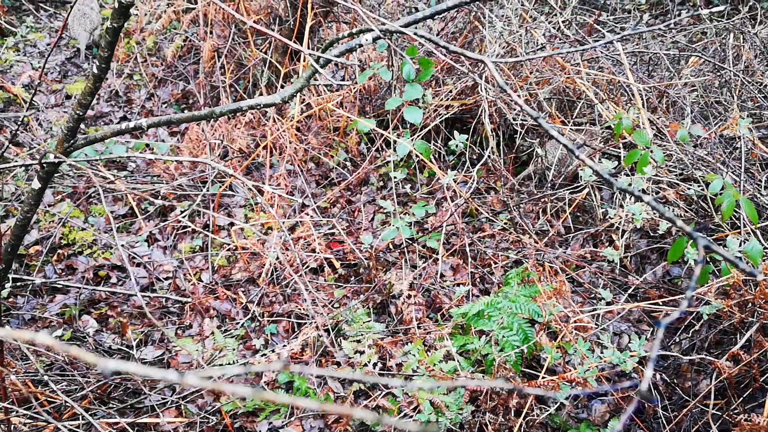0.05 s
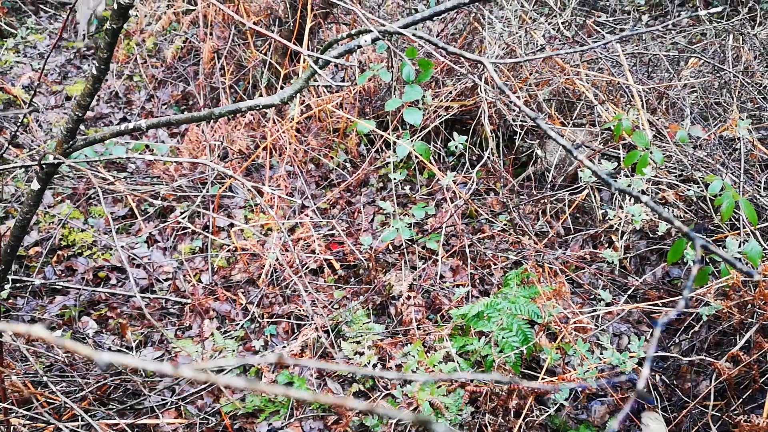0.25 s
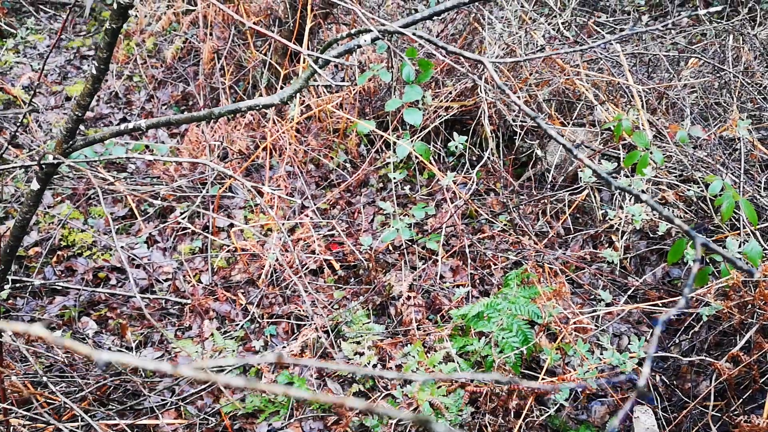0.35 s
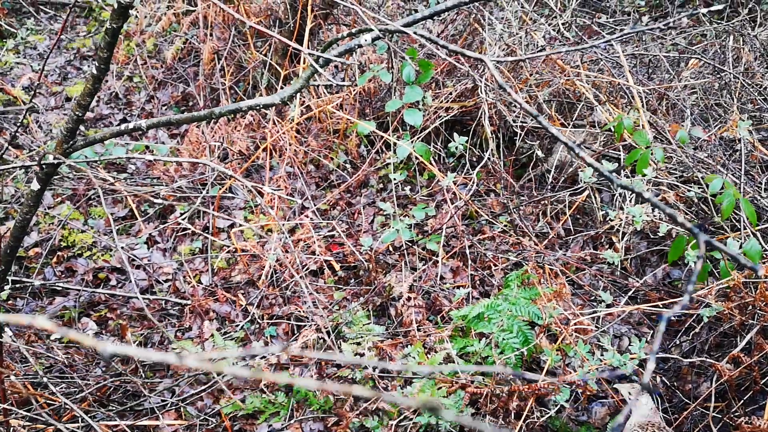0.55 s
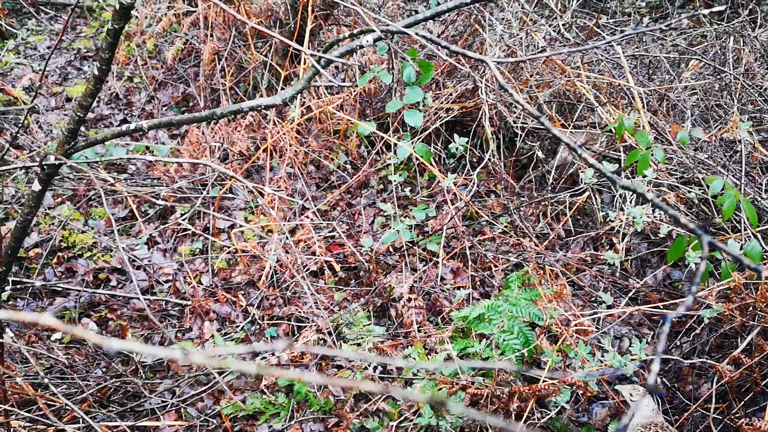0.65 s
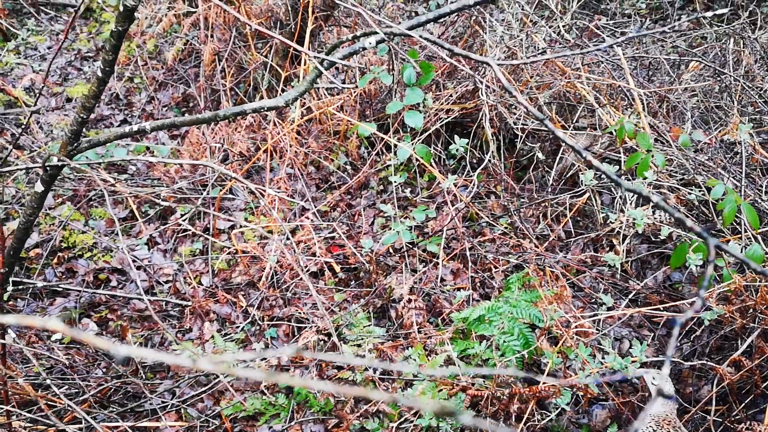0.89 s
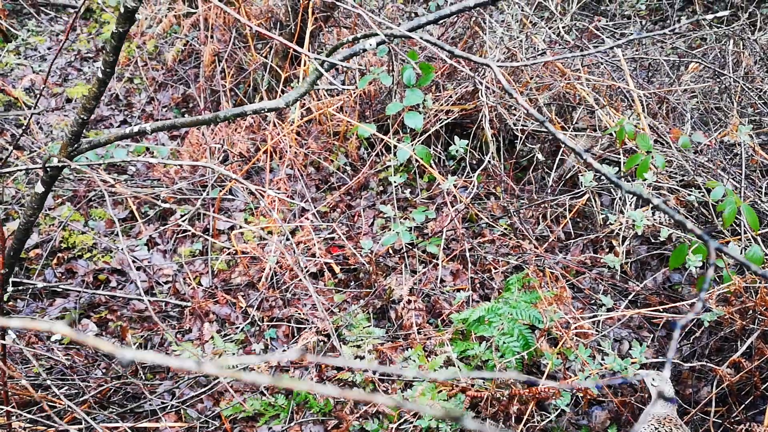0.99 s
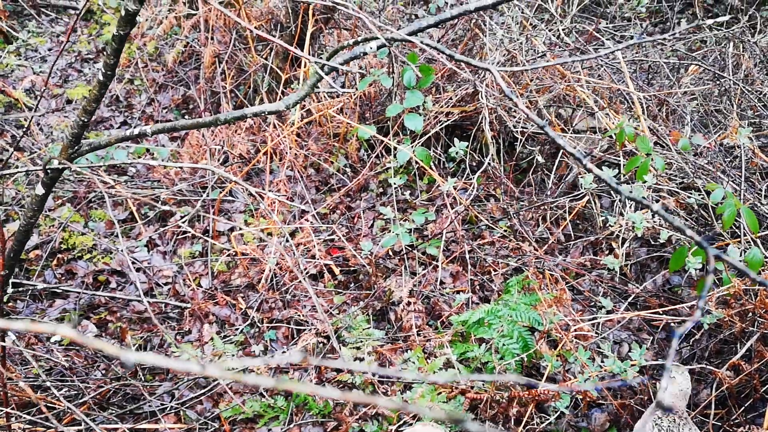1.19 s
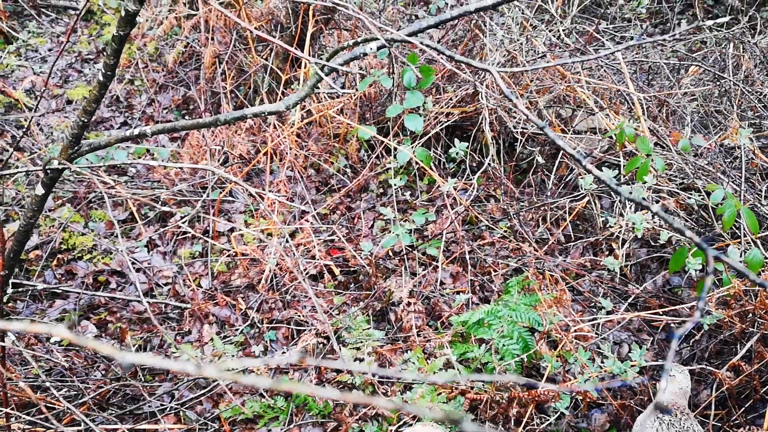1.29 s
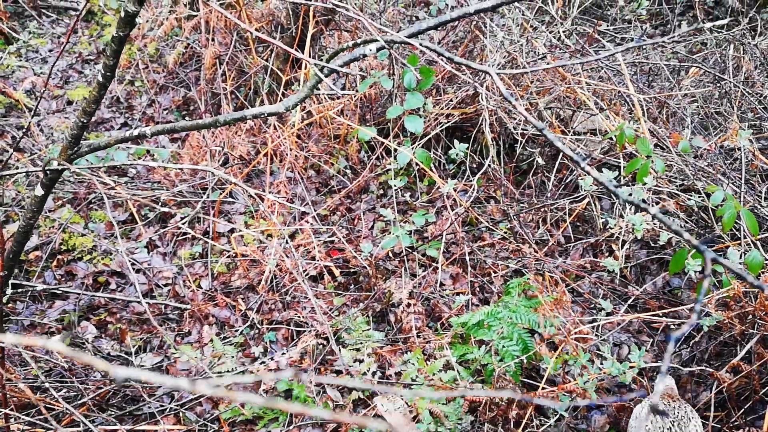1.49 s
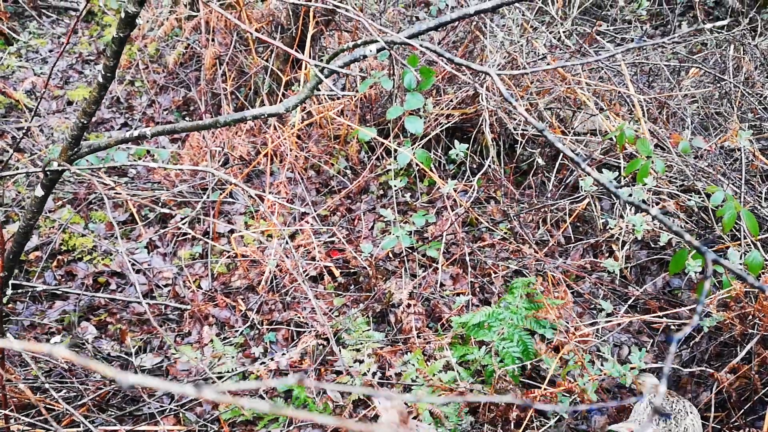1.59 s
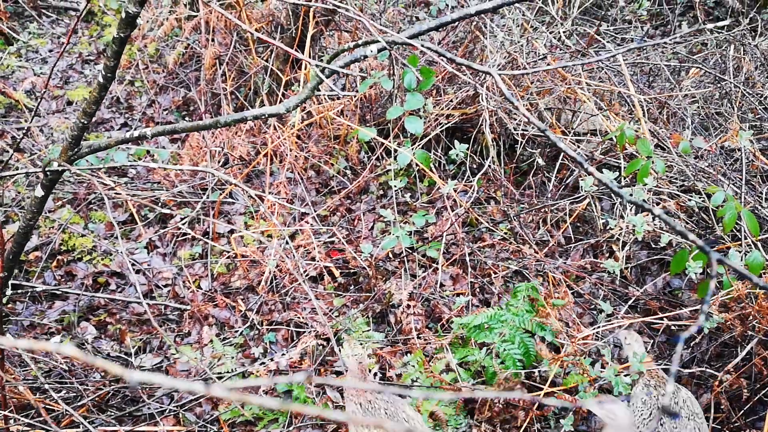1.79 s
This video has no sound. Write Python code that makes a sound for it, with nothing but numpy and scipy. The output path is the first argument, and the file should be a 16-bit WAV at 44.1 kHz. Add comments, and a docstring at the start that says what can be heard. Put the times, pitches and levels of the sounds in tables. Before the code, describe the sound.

Pheasants scuffle in dry bracken and dead leaves. A faint rustle breaks into dull thumps and crunching over a low rumble, then eases to light rustling, twig ticks and two more thumps in a quiet wood.

```python
"""A faint rustle in a quiet wood breaks into a short scuffle: pheasants in dry bracken and dead leaves.
Dull thumps and crunching litter give way to light rustling, small twig ticks and two more thumps.
Each thump is a soft low pulse and a short shudder, with a brief crunch of leaves and stalks on top.
The litter breaks in tiny grains, twigs snap and ring, fronds swish and small stems patter.
A low rumble swells under the scuffle, and faint woodland air lies under it all."""
import sys
import numpy as np
from scipy import signal
from scipy.io import wavfile

SR = 44100
rng = np.random.default_rng(int(sys.argv[2]) if len(sys.argv) > 2 else 0)


def put_to_file(sound):
    """Save the sound as 16-bit audio at rate SR, in the file named by the first command-line argument."""
    columns = np.atleast_2d(sound).T  # one column per channel
    safe = np.clip(columns, -1, 1)
    whole_steps = np.round(safe * 32767)
    wavfile.write(sys.argv[1], SR, whole_steps.astype(np.int16))


N = 81585
T = np.arange(N) / SR

# Tone of the woodland air: frequency_hz, relative_db
AIR_COLOUR = [(20, 7.5), (50, -1), (100, -16), (220, -11.5), (330, -13), (500, -23), (900, -20),
              (1800, -49.5), (3000, -41), (8000, -43.5), (15000, -44)]
# Stereo width of the noise layers: frequency_hz, left_right_correlation
STEREO_LIKENESS = [(60, 1), (150, 1), (300, 0.53), (600, -0.76), (1200, 0.61), (2200, -0.24), (4000, 0.07),
                   (7000, -0.12), (15000, -.1)]

# Level ride of the rustling litter: time_s, leaf_db, stalk_db
RUSTLE_LEVELS = [(0, -71.5, -65.5), (.09, -69.5, -60.5), (.14, -63.5, -57.5), (.22, -57.5, -59),
                 (.245, -49.5, -46.5), (.30, -51, -55), (.36, -45, -45.5), (.395, -60, -50),
                 (.44, -50.5, -51.5), (.48, -48.5, -46), (.52, -49.5, -42), (.555, -46, -39.5),
                 (.60, -60, -54), (.66, -59.5, -60.5), (.76, -65, -61), (.90, -67.5, -61.5),
                 (.95, -62, -64), (1.06, -66, -61), (1.125, -61.5, -62.5), (1.22, -70.5, -66.5),
                 (1.26, -59.5, -60), (1.31, -71.5, -65), (1.375, -61.5, -57.5), (1.46, -70, -63.5),
                 (1.53, -65.5, -61), (1.60, -64.5, -60.5), (1.71, -60, -64.5), (1.79, -65, -63),
                 (1.85, -57, -65)]
# Single crunches, a woody crack with a crisp top: start_s, decay_s, stalk_db, leaf_db
LITTER_CRUNCHES = [(0.166, 0.0045, -43.5, -58), (0.2255, 0.0072, -29, -32), (0.2792, 0.0058, -36, -41),
                   (0.289, 0.0031, -45, -45), (0.3107, 0.001, -50, -43), (0.3132, 0.0099, -32.5, -46),
                   (0.3441, 0.0047, -31, -33), (0.3516, 0.0024, -33.5, -39), (0.4240, 0.007, -38.5, -60),
                   (0.4415, 0.008, -53, -44.5), (0.4633, 0.0041, -32, -37.5), (0.4751, 0.0056, -33.5, -43),
                   (0.5034, 0.0026, -47, -47), (0.5429, 0.0059, -34, -41.5), (0.9229, 0.0022, -59, -41.5),
                   (0.944, 0.0062, -57, -52.5), (1.0209, 0.004, -74, -48), (1.1708, 0.013, -54.5, -61),
                   (1.249, 0.0034, -42.5, -40.5), (1.5359, 0.0025, -53, -75),
                   (1.5482, 0.0074, -46.5, -48.5), (1.812, 0.0052, -54, -48), (1.8302, 0.0021, -55, -45)]
# Crisp tone of dry leaves: frequency_hz, relative_db
LEAF_COLOUR = [(1500, -47), (2600, 0.5), (3300, 2), (4000, -0.5), (4600, -0.5), (5500, 3.5), (6500, 2.5),
               (8000, 2.5), (10000, -11.5), (12500, -14), (15000, -16.5)]
# Woody tone of stalks: frequency_hz, relative_db
STALK_COLOUR = [(350, 15), (520, -0.5), (750, -2.5), (1100, 1), (1500, 7), (2000, 9), (2600, -1),
                (3500, -12.5), (6000, -68)]
# Panning of litter and fronds, band by band: frequency_hz, left_minus_right_db
LITTER_PAN = [(350, -1.5), (650, -17), (1290, 2.5), (2200, 1.5), (4400, -1.5), (8120, 6.5), (10500, -4.5),
              (13000, 1)]

# Level ride of the low rumble: time_s, level_db
RUMBLE_LEVELS = [(0, -75), (.22, -54.5), (.30, -44), (.36, -39.5), (.41, -41.5), (.45, -56), (.49, -40.5),
                 (.57, -65), (.62, -56.5), (.92, -61.5), (1.02, -51), (1.09, -57), (1.85, -61.5)]
# Tone of the rumble: frequency_hz, relative_db
RUMBLE_TONE = [(20, 20), (45, 14.5), (90, 7.5), (170, 9.5), (320, -14), (480, -55), (900, -53)]
# Soft blows of the moving birds: crest_s, level_db, pitch_hz, shudder_db
THUMP_HITS = [(0.1700, -41, 217, -67), (0.2324, -14, 233.4, -30.5), (0.318, -25, 290, -43),
              (0.3555, -22.5, 190, -42), (0.483, -25, 171, -36.5), (0.5085, -36, 195, -40.5),
              (0.5382, -28.5, 200, -42.5), (0.57, -29, 211, -43), (1.1541, -39, 194, -62),
              (1.1670, -33.5, 195, -49), (1.2527, -21.5, 211.5, -37), (1.5556, -23.5, 198, -38)]

# Twigs that tick: start_s, level_db, pitch_hz
TWIG_TICKS = [(0.231, -26, 1080), (0.3158, -25.5, 1050), (0.3765, -31.5, 1468), (0.4008, -38, 1670),
              (0.424, -31, 1600), (0.4418, -30.5, 1352), (0.4617, -33.5, 1156), (0.6127, -33.5, 1760),
              (0.637, -49, 1940), (0.6596, -45, 3640), (0.664, -48, 3840), (0.6974, -40, 1780),
              (0.714, -46.5, 1710), (0.775, -51, 2080), (0.7876, -44, 1489), (0.8105, -44.5, 2004),
              (0.8618, -43.5, 1763), (1.248, -37.5, 2050), (1.2776, -45, 1910), (1.554, -42.5, 1980),
              (1.5812, -48.5, 1927), (1.7835, -45, 3050)]
# Ringing modes of a twig: pitch_ratio, relative_db
TWIG_PARTIALS = [(.72, -12), (1.001, -0.5), (1.17, -8), (1.551, -17), (2.2, -13.5)]
# Soft brushes through the fronds: crest_s, half_width_s, level_db
FROND_SWISHES = [(.33, .04, -56), (0.504, 0.02, -56), (1.168, 0.021, -64), (1.255, .012, -57.5),
                 (1.428, 0.097, -65), (1.555, 0.027, -63.5), (1.628, 0.069, -65), (1.83, 0.005, -56.5)]
# Dull tone of brushed fronds: frequency_hz, relative_db
FROND_COLOUR = [(300, -2), (520, -1), (900, 0.5), (1300, -17), (2000, -49), (3000, -30)]
# Level ride of the pattering stems: time_s, level_db
PATTER_LEVELS = [(0, -96), (.3, -66), (.56, -54), (.66, -65), (.9, -67), (1.1, -71.5), (1.38, -73),
                 (1.85, -67.5)]

PAN_SPLIT = np.array([[.5], [-.5]])   # half of a pan's dB lifts the left, half lowers the right
WOOD_PAN_DB = 3   # twigs and stems sit a little to the left


def from_db(db):
    """Decibels to gain."""
    return 10 ** (np.asarray(db) / 20)


def rms_one(x):
    """Scale to rms 1."""
    return x / np.sqrt(np.mean(x ** 2) + 1e-20)


def ride(rows):
    """Fader curves: straight lines through timed points, one curve for each level column."""
    times, *columns = np.transpose(rows)
    return [np.interp(T, times, column) for column in columns]


def at_hz(points, hz):
    """Read a curve on a log-frequency axis."""
    frequencies, values = np.transpose(points)
    return np.interp(np.log(hz), np.log(frequencies), values)


def band(x, low_hz, high_hz, order=2):
    """Butterworth band-pass."""
    edges_hz = [low_hz, min(high_hz, SR / 2 - 100)]
    return signal.sosfilt(signal.butter(order, edges_hz, "band", fs=SR, output="sos"), x + 1e-18)


def drift(rate_hz):
    """A smooth random wobble of rms 1."""
    pole = np.exp(-2 * np.pi * rate_hz / SR)
    return rms_one(signal.lfilter([1], [1, -2 * pole, pole * pole], rng.standard_normal(2 * N))[N:])


def swell(start_s, rise_s, decay_s):
    """A straight attack, then an exponential tail."""
    age = np.maximum(T - start_s, 0)
    return np.minimum(age / rise_s, 1) * np.exp(-np.maximum(age - rise_s, 0) / decay_s)


def grains(per_s, spread_db):
    """Random tiny fractures of uneven size, as four uncorrelated streams that share their timing."""
    sizes = from_db(spread_db * np.minimum(rng.exponential(1, N), 5))
    breaks = rng.random(N) < per_s / SR
    return rms_one(sizes * breaks * rng.standard_normal((2, 2, N)))


def coloured(drive, colour, pan_curve=None, flicker_db=0):
    """Third-octave EQ that turns two white mid/side pairs into stereo at about the same level."""
    out, power = 0, 0
    edges_hz = 18 * 2 ** (np.arange(31) / 3)
    for k, (low, high) in enumerate(zip(edges_hz, edges_hz[1:])):
        hz = np.sqrt(low * high)
        if not colour[0][0] / 2 < hz < colour[-1][0] * 2:
            continue
        mid, side = band(drive[k % 2], low, high, order=3 if hz > 1000 else 2)
        alike = np.clip(at_hz(STEREO_LIKENESS, hz), -1, 1)
        stereo = np.sqrt(1 + alike) * mid + np.sqrt(1 - alike) * side * [[1], [-1]]
        gain = from_db(at_hz(colour, hz))
        pan = from_db(PAN_SPLIT * at_hz(pan_curve, hz)) if pan_curve else 1
        flicker = from_db(flicker_db * drift(rate_hz=92)) if flicker_db else 1
        out += gain * pan * flicker * stereo
        power += 2 * gain ** 2 * (high - low) / (SR / 2)
    return out / np.sqrt(power)


def woodland_air():
    """The quiet wood: a faint, steady bed of dark noise."""
    return from_db(-58) * coloured(rng.standard_normal((2, 2, 2 * N)), AIR_COLOUR)[:, N:]


def litter():
    """Leaves and stalks break in tiny grains: a clumpy running rustle, with sharp crunches on top."""
    leaf_db, stalk_db = ride(RUSTLE_LEVELS)
    clumps_db = drift(rate_hz=21)
    cracks, crisps = np.zeros((2, N))
    for start_s, decay_s, crack_db, crisp_db in LITTER_CRUNCHES:
        envelope = swell(start_s, rise_s=0.19 * decay_s, decay_s=decay_s)
        cracks += from_db(crack_db) * envelope
        crisps += from_db(crisp_db) * envelope
    out = 0
    for colour, level_db, bursts in (LEAF_COLOUR, leaf_db, crisps), (STALK_COLOUR, stalk_db, cracks):
        rustle = from_db(level_db + clumps_db) * grains(per_s=7000, spread_db=2.5)
        crunch = bursts * grains(per_s=12000, spread_db=0.5)
        # Each leaf favours bands of its own, so the tone flickers.
        out += coloured(rustle + crunch, colour, LITTER_PAN, flicker_db=1.61)
    return out


def rumble():
    """Low, uneven buffeting that gives the scuffle its weight."""
    level_db, = ride(RUMBLE_LEVELS)
    return from_db(level_db) * coloured(rng.standard_normal((2, 2, N)), RUMBLE_TONE)


def thumps():
    """Each soft blow gives a low pulse of under two cycles, sinking in pitch, and a short shudder."""
    rise_cycles, fall_cycles, sag_cycles = 0.46, 0.69, 3.8
    out = np.zeros(N)
    for crest_s, level_db, pitch_hz, shudder_db in THUMP_HITS:
        cycles = (T - crest_s) * pitch_hz
        before, after = np.minimum(cycles, 0), np.maximum(cycles, 0)
        phase = 2 * np.pi * (before + sag_cycles * np.log1p(after / sag_cycles))
        pulse = np.cos(phase) * np.exp(-(before / rise_cycles) ** 2 - (after / fall_cycles) ** 2)
        shudder = rms_one(band(rng.standard_normal(N), low_hz=106.5, high_hz=262))
        shudder *= swell(crest_s, rise_s=0.008, decay_s=0.015)
        out += from_db(level_db) * pulse + from_db(shudder_db) * shudder
    return out


def twigs():
    """A tiny snap sets a few heavily damped modes of a twig ringing."""
    rise_s, ring_decay_s, snap_decay_s = 0.00058, 0.0022, 0.0016
    out = np.zeros((2, N))
    snap_noise = from_db(-18) * rms_one(band(rng.standard_normal((2, N)), low_hz=900, high_hz=6000))
    for start_s, level_db, pitch_hz in TWIG_TICKS:
        modes = sum(from_db(mode_db) * np.sin(2 * np.pi * (pitch_hz * ratio * T + rng.random((2, 1))))
                    for ratio, mode_db in TWIG_PARTIALS)
        ring = modes * swell(start_s, rise_s, ring_decay_s)
        snap = snap_noise * swell(start_s, rise_s, snap_decay_s)
        out += from_db(level_db) * (ring + snap)
    return out * from_db(WOOD_PAN_DB * PAN_SPLIT)


def fronds():
    """Brushed fronds give dull swishes that swell and fade smoothly."""
    envelope = sum(from_db(level_db) * np.exp(-((T - crest_s) / half_width_s) ** 2)
                   for crest_s, half_width_s, level_db in FROND_SWISHES)
    return envelope * coloured(rng.standard_normal((2, 2, N)), FROND_COLOUR, LITTER_PAN)


def stem_patter():
    """Many tiny knocks of stems, all ringing in one narrow woody range."""
    level_db, = ride(PATTER_LEVELS)
    knocks = grains(per_s=500, spread_db=2)[0]
    ring = rms_one(band(knocks, low_hz=1654, high_hz=2000))
    return from_db(level_db + WOOD_PAN_DB * PAN_SPLIT) * ring


def scene():
    """The low layers come from the right, reaching the left later; the litter crackles all round."""
    left_lag_s = 0.00034
    left, right = thumps() + rumble() + woodland_air()
    lows = np.array([np.interp(T - left_lag_s, T, left), right])
    return lows + litter() + twigs() + stem_patter() + fronds()


def record(dry):
    """A steep low-pass takes the very top off the mix."""
    stop_hz, stop_db = 16000, 55
    return signal.sosfilt(signal.cheby2(14, stop_db, stop_hz, fs=SR, output="sos"), dry)


dry = scene()
out = record(dry)
put_to_file(out)
```